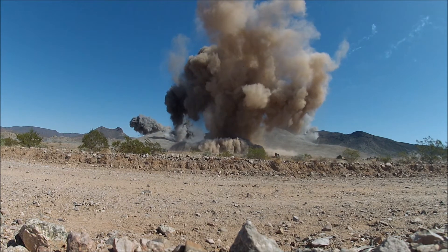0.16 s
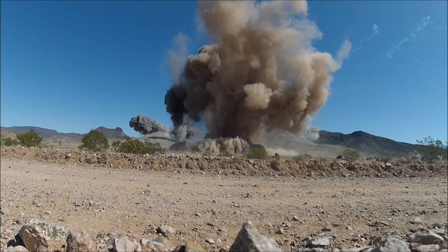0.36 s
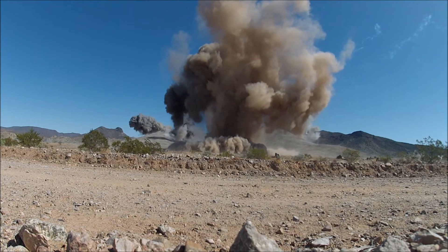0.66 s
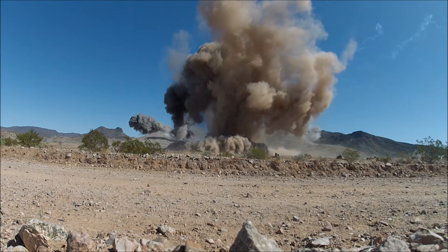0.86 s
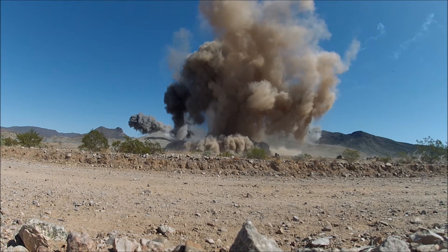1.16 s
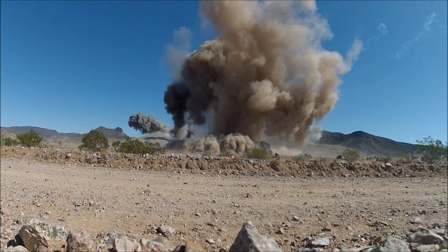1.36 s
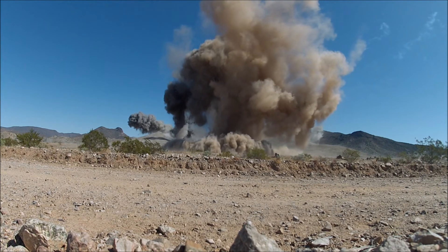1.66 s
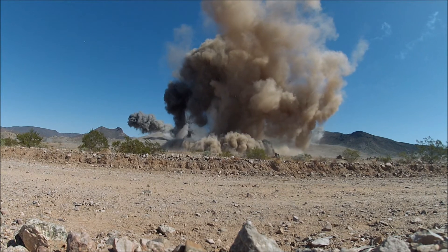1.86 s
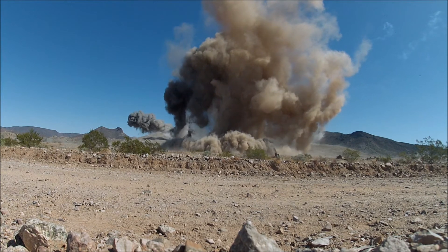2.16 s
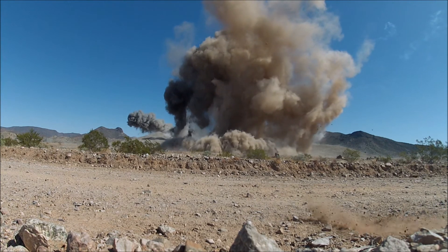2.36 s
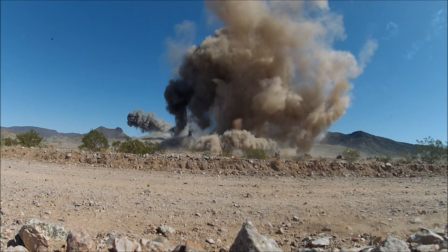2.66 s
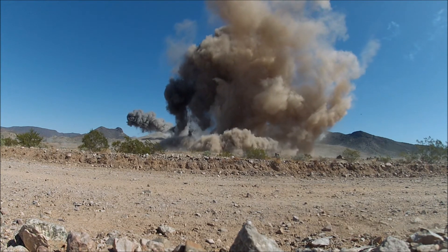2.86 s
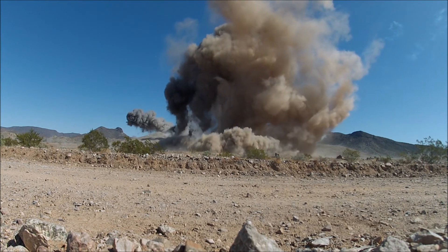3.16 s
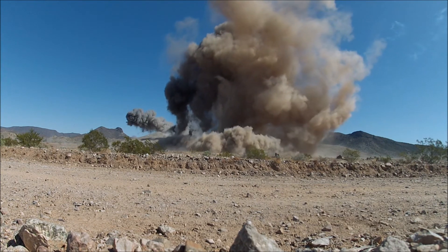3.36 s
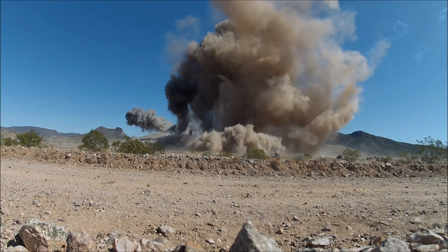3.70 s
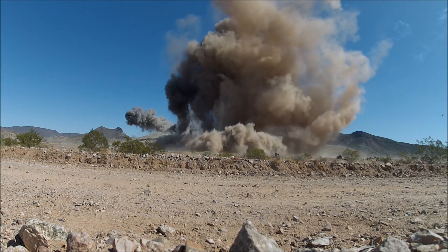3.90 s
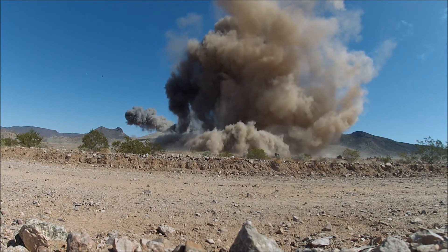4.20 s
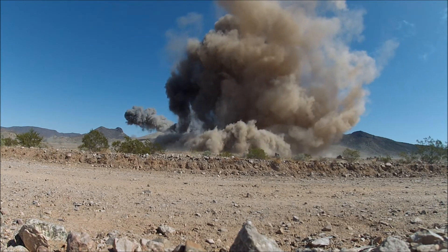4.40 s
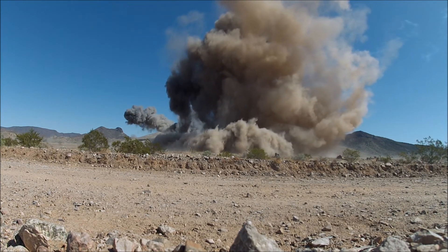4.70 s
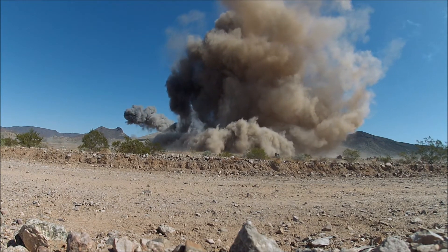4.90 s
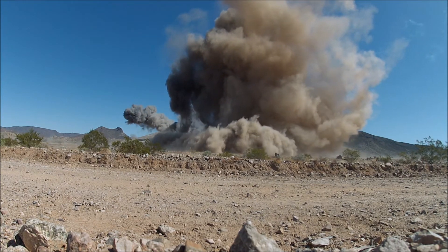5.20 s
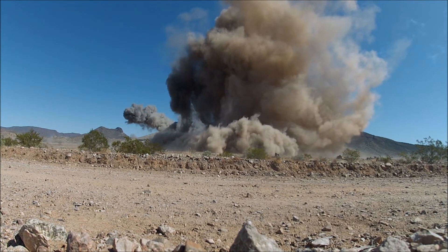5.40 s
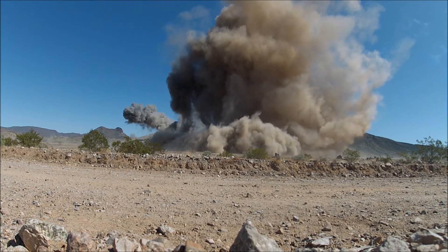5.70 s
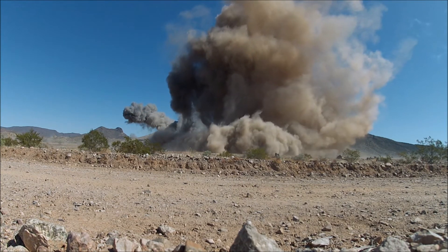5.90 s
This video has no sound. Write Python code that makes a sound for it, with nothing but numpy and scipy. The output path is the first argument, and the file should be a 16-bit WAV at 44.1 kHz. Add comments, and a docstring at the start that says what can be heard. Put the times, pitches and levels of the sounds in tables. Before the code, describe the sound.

Low rumbling and dull rock thuds around a small camera on stony ground, broken midway by a burst of hard, loud stone cracks.

```python
"""Debris of a large desert blast rains down around a small sealed camera on stony ground.
From the start a far rumble, the patter of distant fall-out and electronic hiss lie under soft thuds,
which are rocks shaking the stand through the soil, while sparse pebbles tick on the housing.
At 2.2 s a boulder lands beside the stand, and the hardest cracks follow until 2.7 s.
Then the hits thin out and the fall-out fades; modes ring each blow, shaped noise makes the rest."""
import sys
import numpy as np
from scipy import signal
from scipy.fft import rfft, irfft, next_fast_len
from scipy.io import wavfile

SR = 44100
rng = np.random.default_rng(int(sys.argv[2]) if len(sys.argv) > 2 else 0)


def store_pcm(level_fs):
    """Save levels as 16-bit WAV."""
    pcm = np.round(np.clip(level_fs, -1, 1) * 32767).astype(np.int16)
    wavfile.write(sys.argv[1], SR, np.atleast_2d(pcm).T)


N = 266805


def from_db(db):
    """Logarithmic level: decibels to amplitude gain."""
    return 10 ** (np.asarray(db) / 20)


def rms_one(x):
    """Normalisation: scale to rms 1."""
    return x / np.sqrt(np.mean(x ** 2) + 1e-20)


def coloured(spectrum):
    """Spectral shaping: white noise filtered by a (Hz, dB) curve; rms 1."""
    hz, db = np.transpose(spectrum)
    size = next_fast_len(N)
    f = np.maximum(np.fft.rfftfreq(size, 1 / SR), 1)
    gain = from_db(np.interp(np.log(f), np.log(hz), db))
    return rms_one(irfft(rfft(rng.standard_normal(size)) * gain, size)[:N])


def drift(corner_hz):
    """Slow random modulation: noise low-passed by two equal poles at corner_hz; rms 1."""
    step = 40   # samples between control points
    r = np.exp(-2 * np.pi * corner_hz * step / SR)
    settling = 2000   # control points dropped while the filter settles
    noise = rng.standard_normal(N // step + settling + 2)
    slow = signal.lfilter([1], [1, -2 * r, r * r], noise)[settling:]
    return np.interp(np.arange(N) / step, np.arange(len(slow)), rms_one(slow))


def ring(x, hz, t60):
    """Modal resonance: a unit click sets a decaying sine of height 1 ringing."""
    r, w = from_db(-60 / (t60 * SR)), 2 * np.pi * hz / SR
    return signal.lfilter([0, np.sin(w)], [1, -2 * r * np.cos(w), r * r], x + 1e-18)


def low_pass(x, corner_hz):
    """First-order damping: one pole dulls the sound above corner_hz."""
    return signal.lfilter([1], [1, -np.exp(-2 * np.pi * corner_hz / SR)], x)


def favoured(level_db, centre, octaves, below_db, above_db):
    """Selective excitation: the part nearest the favoured pitch gets level_db, the others lose dB per octave."""
    off = np.asarray(octaves) - centre
    loss_db = np.where(off < 0, -below_db * off, above_db * off)
    return level_db - loss_db + loss_db.min()


# electronic hiss, equal in both channels: pitch_hz [Hz], density_db [relative dB per Hz]
HISS_SPECTRUM = [(150, -30.5), (250, 0), (353, -6), (398, -9), (490, -10), (1610, -21), (1920, -24.5),
                 (2620, -24), (15500, -33)]
# electronic hiss, opposite in sign between the channels: pitch_hz [Hz], density_db [relative dB per Hz]
SIDE_HISS_SPECTRUM = [(150, -44.5), (250, -20), (353, -8), (1380, -15), (1790, -11), (3330, -5),
                      (12000, -7.5), (15500, -16)]
HISS_DB, SIDE_HISS_DB = -60, -76   # rms levels


def hiss():
    """Stationary electronic noise: a common part plus a part of opposite sign in left and right."""
    common = from_db(HISS_DB) * coloured(HISS_SPECTRUM)
    side = from_db(SIDE_HISS_DB) * coloured(SIDE_HISS_SPECTRUM)
    return common + side * [[1], [-1]]


# course of the fall-out all over the plain: start_s [s],
# rumble_db [dB, before the trim below], patter_db [dB, before the trim below]
FALLOUT = [(0.0, -31.5, -56.5), (0.4, -29.5, -63), (0.52, -44.5, -62), (0.79, -35, -60), (1.01, -23, -60.5),
           (1.18, -35, -59.5), (2.31, -20, -55.5), (2.48, -25.5, -58), (2.61, -33, -51.5),
           (2.899, -22.5, -56.5), (3.169, -30, -59.5), (3.689, -28.5, -59.5), (3.84, -25, -59),
           (4.21, -24.5, -63), (4.38, -33.5, -63.5), (5.171, -41, -64.5), (5.63, -41, -66.5),
           (6.05, -35, -67.5)]
RUMBLE_TRIM_DB, PATTER_TRIM_DB = -5, 1.5


def fallout_levels():
    """Level envelopes: the rumble and patter follow straight lines in dB between the table's moments."""
    start_s, rumble_db, patter_db = np.transpose(FALLOUT)
    t = np.arange(N) / SR
    rumble_db = np.interp(t, start_s, rumble_db) + RUMBLE_TRIM_DB
    patter_db = np.interp(t, start_s, patter_db) + PATTER_TRIM_DB
    return rumble_db, patter_db


# resonances of the rumble: pitch_hz [Hz], width_hz [Hz, of each of two resonators in a row],
# level_db [dB, relative]
RUMBLE_MODES = [(30.2, 20, -14.5), (55.2, 7.3, -3.5), (88.3, 14, 0.5), (118.94, 14, 3.5),
                (167.5, 6.1, -12.5), (211, 17, -24)]
RUMBLE_SWELL_DB, RUMBLE_SWELL_HZ = 1.74, 4   # rms depth and corner of the slow swells


def rumble(level_db):
    """Resonance under random excitation: countless far landings keep the same modes humming."""
    out = np.zeros(N)
    for hz, width_hz, db in RUMBLE_MODES:
        t60 = np.log(1000) / (np.pi * width_hz)
        hum = ring(ring(rng.standard_normal(N), hz, t60), hz, t60)
        swell_db = RUMBLE_SWELL_DB * drift(RUMBLE_SWELL_HZ)   # each resonance swells on its own
        out += from_db(db + swell_db) * rms_one(hum)
    return from_db(level_db) * rms_one(out)


# spectrum of the patter: pitch_hz [Hz], density_db [relative dB per Hz]
PATTER_SPECTRUM = [(110, -28.5), (180, 7), (268, -18.5), (374, -8.5), (513, -9.5), (556, -11), (881, -11.5),
                   (1140, -32), (1510, -22.5), (8000, -34.5), (10400, -64), (17600, -120)]


def patter(level_db):
    """Superposition of many impacts: distant fall-out merges into coloured noise of fluttering level."""
    flutter_db = drift(9.6)   # 1 dB rms
    return from_db(level_db + flutter_db) * coloured(PATTER_SPECTRUM)


# housing parts, each: low_hz [Hz], high_hz [Hz], bare_db [dB, contact noise against the modes],
# list of modes: pitch_hz [Hz], level_db [dB, relative], t60_s [s]
BODY = (910, 1950, -7, [(1310, -8.5, .015), (1421, -0.5, 0.013), (1750, -3, 0.0078)])
SHELL = (1600, 4200, 9, [(2170, -4.5, 0.0098), (2700, -9, .015)])
CRACK = (2800, 13000, 12, [(4360, -21.5, 0.0083), (5600, -19, 0.015), (6600, -19, 0.02), (7700, -22, 0.02)])
KNOCK = (220, 1100, 12, [(505, -13.5, .012), (800, -8.5, .012)])   # the whole housing rocking
GRIT_PER_S, GRIT_DB = 180, -10.5   # mean rate, level against the patter


def grit(level_db):
    """Poisson excitation: random faint grains of all sizes tickle the housing modes."""
    size_db = 4 * np.minimum(rng.exponential(1, N), 4)
    lands = rng.random(N) < GRIT_PER_S / SR
    grains = from_db(size_db) * lands * rng.standard_normal(N)
    out = np.zeros(N)
    for hz, db, t60 in BODY[3] + SHELL[3] + CRACK[3]:
        out += from_db(db) * ring(grains, hz, t60)
    return from_db(level_db + GRIT_DB) * rms_one(out)


# modes of the stand on the soil, one list a group: pitch_hz [Hz], share_db [dB], delay_s [s],
# rise_s [s, before the soil's stretch]; the first group is the main sway
STAND_MODES = [
    [(122.58, -0.65, 0.0026, .028)],
    [(56.15, -4.5, 0.0087, .032)],
    [(83.6, -2.23, 0.0021, 0.033)],
    [(145, -5, .018, 0.031), (183.5, -3, .019, .013), (198.7, -5.5, .02, 0.013),
     (231, -17.5, 0.051, 0.0032)],
]
# rocks landing in the soil: start_s [s], level_db [dB, of the strongest group before its modes' shares],
# favoured_pitch [octaves from the main sway; heavy far rocks lie low]
ROCKS = [(0.003, -45, 0.43), (0.177, -24.5, -0.89), (0.233, -29.5, -0.48), (0.285, -20, 0.079),
         (0.478, -33.5, 0.099), (0.564, -33, -0.79), (0.676, -32, -0.07), (0.718, -34, -0.39),
         (0.848, -24, -0.3), (0.908, -26.5, 0.012), (0.982, -25.5, -0.29), (1.045, -25.5, -0.18),
         (1.098, -24, -.5), (1.183, -33, -0.65), (1.277, -29.5, -.4), (1.369, -17, -0.26),
         (1.42, -24.5, -0.23), (1.484, -22, -0.16), (1.568, -23.5, -0.19), (1.628, -28, -1.3),
         (1.706, -29.5, 0.14), (1.787, -21.5, -0.014), (1.891, -33, -.33), (1.986, -25.5, -0.14),
         (2.053, -18, -0.084), (2.094, -17.5, 0.13), (2.187, -37, -0.83), (2.202, -23.5, .45),
         (2.384, -16, -0.039), (2.427, -23.5, 0.1), (2.49, -19.5, 0.15), (2.55, -17.5, 0.27),
         (2.599, -34, .3), (2.7, -26.5, 0.13), (2.781, -12.5, 0.04), (2.788, -18.5, -1.2),
         (2.871, -18, -0.25), (2.96, -28, -0.082), (3.024, -22, -.05), (3.078, -27.5, 0.063),
         (3.141, -36.5, -1.1), (3.302, -29, -0.23), (3.412, -22, -0.16), (3.497, -35.5, -.55),
         (3.6, -28, -0.84), (3.658, -20.5, 0.2), (3.713, -26, 0.064), (3.808, -23, -0.86),
         (3.931, -19, -1.24), (4.036, -22, -0.37), (4.086, -28, -0.013), (4.209, -31, -0.17),
         (4.305, -14, -0.049), (4.452, -35.5, -0.21), (4.597, -29.5, -0.3), (4.654, -17, 0.0087),
         (4.845, -33, -1.2), (4.937, -22.5, -0.17), (4.981, -26, 0.2), (5.041, -34, -1.2),
         (5.29, -38.5, -0.2), (5.371, -35.5, -1.1), (5.596, -32, -0.46), (5.648, -33.5, -0.28),
         (5.711, -29.5, -0.95), (5.763, -34, -0.36), (5.826, -19, -1.15), (5.898, -29, -1.54)]
THUD_FALL_DB_OCT = 31.5   # loss of groups away from the favoured pitch
SOIL_STRETCH = 1.02   # factor on every rise


def thuds():
    """Dispersion in the soil spreads each blow: modes swell and die as (t / rise)^2 exp(-2 t / rise)."""
    out = np.zeros(N + SR)
    sway_hz = STAND_MODES[0][0][0]
    octaves = [np.log2(np.mean([m[0] for m in modes]) / sway_hz) for modes in STAND_MODES]
    for start_s, rock_db, centre in ROCKS:
        at = round(start_s * SR)
        levels_db = favoured(rock_db, centre, octaves, THUD_FALL_DB_OCT, THUD_FALL_DB_OCT)
        for modes, level_db in zip(STAND_MODES, levels_db):
            for hz, share_db, delay_s, rise_s in modes:
                t = np.maximum(np.arange(SR // 3) / SR - delay_s, 0)
                u = t / (rise_s * SOIL_STRETCH)
                swell = (u * np.exp(1 - u)) ** 2   # peaks at 1
                out[at:at + len(t)] += from_db(level_db + share_db) * swell * np.sin(2 * np.pi * hz * t)
    return out[:N]


# a heavy rock landing right beside the stand: start_s [s], level_db [dB, before the modes' shares]
BOULDER_HIT = (2.246, -7.5)
# modes its jolt rings: pitch_hz [Hz], share_db [dB], delay_s [s], rise_s [s]
JOLT_MODES = [(109.3, -2.5, .012, 0.023), (147, -3, 0.001, 0.011), (216, -6, 0.001, 0.0087),
              (244, -15.5, .001, 0.009)]


def boulder():
    """Near-field impact: high modes jump up at once, the main sway follows and rings on, as u exp(-u)."""
    start_s, level_db = BOULDER_HIT
    out = np.zeros(N)
    for hz, share_db, delay_s, rise_s in JOLT_MODES:
        t = np.maximum(np.arange(N) / SR - start_s - delay_s, 0)
        u = t / rise_s
        out += from_db(level_db + share_db) * u * np.exp(1 - u) * np.sin(2 * np.pi * hz * t)
    return out


# small pebbles at random moments: row levels start at STRAY_DB over the patter and only go up
STRAYS, STRAY_DB, STRAY_SPREAD_DB = 16, 5, 3
STRAY_FALL_DB_OCT, STRAY_TAIL_DB = 8, -21


def strays(patter_db):
    """Rate-modulated chance: pebble rows come oftener and louder while the patter is strong."""
    when, size, pitch = rng.random((STRAYS, 3)).T
    share = np.cumsum(from_db(patter_db))
    at = np.minimum(np.searchsorted(share / share[-1], when), N - 1)
    level_db = patter_db[at] + STRAY_DB - STRAY_SPREAD_DB * np.log(1 - 0.9 * size)
    centre = 1.8 * pitch - 0.6
    fall_db, tail_db = np.full(STRAYS, STRAY_FALL_DB_OCT), np.full(STRAYS, STRAY_TAIL_DB)
    return list(zip(at / SR, level_db, centre, fall_db, tail_db))


# pebbles on the housing: start_s [s], level_db [dB, before HIT_TRIM_DB],
# favoured_pitch [octaves from the body; small hard chips lie high],
# fall_db [dB per octave, loss of the other parts], tail_db [dB, loose grit against the chatter]
PEBBLE_HITS = [(0.145, -54.5, 9, 5, -15), (0.5914, -58.5, 6, 8, -24), (0.709, -56, 3, 5.7, 1),
               (0.818, -47.5, 0.1, 8, -14), (1.3466, -48.5, 0.15, 11, -22), (1.3957, -54, -1.2, 12, -31),
               (1.4596, -44, 1.2, 14, -14), (1.49, -54, 2.5, 17, -26), (1.526, -53, -.5, 7, -30),
               (1.563, -42.5, 0.36, 11, -28), (1.6037, -52, -0.7, 14, -27), (1.7, -60, 9, 3, 4),
               (1.7474, -53.5, 1.1, 9, -16), (1.915, -42.5, -0.06, 14, -36), (1.955, -54.5, 0.8, 5.4, -22),
               (2.0482, -40.5, 0.2, 8, -27), (2.0807, -53, 0.9, 9, -4), (2.106, -49.5, 1.1, 5, -21),
               (2.199, -46, 0.5, 7.8, -9), (2.2458, -25.5, 0.44, 9, -42), (2.259, -32.5, -1, 6, -18),
               (2.264, -51, 8, 11, -15), (2.285, -52, 0.5, 3, -25), (2.353, -69, 0.5, 5, -20),
               (2.4002, 4, 2.46, 6, -18), (2.4815, -31, .4, 16, -37), (2.4885, -41, 3, 4, -27),
               (2.512, -23, 0.97, 10.8, -9.5), (2.5566, -47, 1.4, 5.6, -19), (2.588, -27.5, 1.7, 10, -12),
               (2.6072, -20.5, 8, 15, -22), (2.6243, -0.5, 0.29, 21, -20), (2.6328, -23, 1.9, 5, -22),
               (2.6366, -16, 0.26, 22, -16), (2.6444, -30, 5, 7.4, -7), (2.6482, -31.5, 1.8, 5, -22),
               (2.6816, -40, 0.25, 10, -13), (2.7052, -27.5, 7, 20, -12.5), (2.72, -36, 1.5, 13, -11),
               (2.742, -46, 1, 5.4, -24), (2.7726, -38, 0.5, 4, -8.5), (2.791, -47, -0.3, 11, -27),
               (2.838, -52.5, 9.5, 8.5, -22), (2.9347, -43.5, 0.5, 3.3, -11.5),
               (3.0254, -46, 0.86, 5.5, 1.5), (3.0953, -50.5, -0.5, 8, -26), (3.2904, -49.5, 0, 6.4, -22),
               (3.3822, -46.5, 1.05, 7.5, -12), (3.6639, -30.5, 0.5, 13, -30), (3.7244, -51.5, 2, 3, -16),
               (3.828, -49.5, -0.5, 9.8, -15.5), (4.0494, -46.5, -0.1, 10, -21), (4.1515, -50, 0, 8, -19),
               (4.2786, -40.5, 0.5, 8.9, -31), (4.613, -51.5, 0.3, 9.4, -21.5),
               (4.9736, -51.5, 0.46, 9, -17), (5.5963, -49.5, -0.43, 11, -21)]
HIT_TRIM_DB, MODE_TRIM_DB = -4, -7.5   # on every part, on every mode before the contact noise joins
FIRST_TOUCH_DB = 17.5   # one sharp click, over the chatter
RATTLE_S, RATTLE_DB_PER_DOUBLING = 0.0013, 59.5   # chatter of a row at -31 dB, longer for strong hits
TAIL_T60_S, TAIL_DULL_HZ = 0.054, 3180   # loose grit trickles off after a hit, duller than the hit
CONTACT_HZ = 8000   # stone on plastic is not perfectly hard: the treble falls off
KNOCK_LIFT_DB = 9   # every hit also rocks the whole housing


def contact(level_db, tail_db):
    """Contact force: a pebble clicks, chatters for a few ms, and grit trickles after."""
    t = np.arange(4000) / SR
    chatter, trickle = rng.standard_normal((2, len(t)))
    rattle_s = RATTLE_S * 2 ** ((level_db + 31) / RATTLE_DB_PER_DOUBLING)
    force = chatter * np.exp(-(t / rattle_s) ** 2)
    force += rms_one(low_pass(trickle, TAIL_DULL_HZ)) * from_db(tail_db - 60 * t / TAIL_T60_S)
    force[0] = from_db(FIRST_TOUCH_DB)
    return low_pass(force, CONTACT_HZ)


def pebbles(rows):
    """Forced modal response: each housing part passes the contact force and rings with it."""
    out = np.zeros(N + SR)
    parts = BODY, SHELL, CRACK, KNOCK
    octaves = [np.log2(p[0] * p[1] / (BODY[0] * BODY[1])) / 2 for p in parts]   # of the band centres
    for start_s, hit_db, centre, fall_db, tail_db in rows:
        force = contact(hit_db, tail_db)
        at = round(start_s * SR)
        levels_db = favoured(hit_db, centre, octaves, fall_db, fall_db) + [0, 0, 0, KNOCK_LIFT_DB]
        for (low_hz, high_hz, bare_db, modes), level_db in zip(parts, levels_db):
            sound = from_db(bare_db) * force
            for hz, db, t60 in modes:
                luck_db = 2 * rng.standard_normal()   # every spot strikes the modes differently
                sound = sound + from_db(db + luck_db + MODE_TRIM_DB) * ring(force, hz, t60)
            band = signal.butter(2, [low_hz, high_hz], "band", fs=SR, output="sos")
            part = signal.sosfilt(band, sound)
            first = part[:SR // 200]   # level is set by the first 5 ms
            gain = from_db(level_db + HIT_TRIM_DB) / np.sqrt(np.mean(first ** 2))
            out[at:at + len(part)] += gain * part
    return out[:N]


def scene():
    """Linear superposition: one microphone hears it all; only part of the hiss differs by channel."""
    rumble_db, patter_db = fallout_levels()
    background = rumble(rumble_db) + patter(patter_db) + grit(patter_db)
    blows = thuds() + boulder() + pebbles(PEBBLE_HITS + strays(patter_db))
    return background + blows + hiss()


LIMIT_DB, RELEASE_DB_S, ATTACK_S = -0.5, 249, 0.01
CLIP = 0.92   # ceiling of the rounding, full scale is 1
CUTOFF_HZ = 16000   # stop-band edge


def record(dry):
    """Gain reduction and saturation: a limiter ducks after the loudest blows, peaks round, the top is cut."""
    ramp = RELEASE_DB_S * np.arange(N) / SR
    over_db = np.maximum(20 * np.log10(np.abs(dry).max(axis=0) + 1e-9) - LIMIT_DB, 0)
    held_db = np.maximum.accumulate(over_db + ramp) - ramp   # falls at the release rate
    r = np.exp(-1 / (ATTACK_S * SR))   # the slow attack lets the first crack through
    duck_db = signal.lfilter([1 - r], [1, -r], held_db)
    rounded = CLIP * np.tanh(dry * from_db(-duck_db) / CLIP)
    return signal.sosfilt(signal.cheby2(16, 95, CUTOFF_HZ, fs=SR, output="sos"), rounded)


dry = scene()
out = record(dry)
store_pcm(out)
```